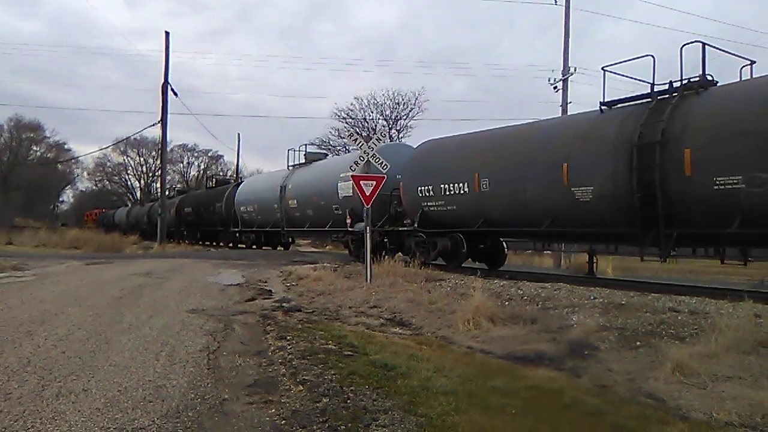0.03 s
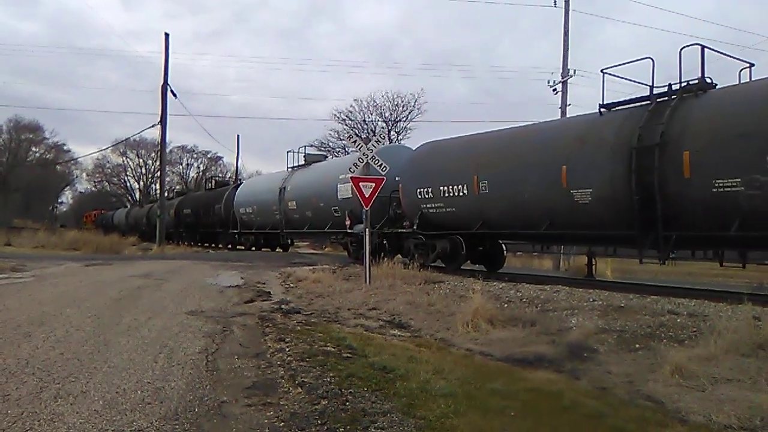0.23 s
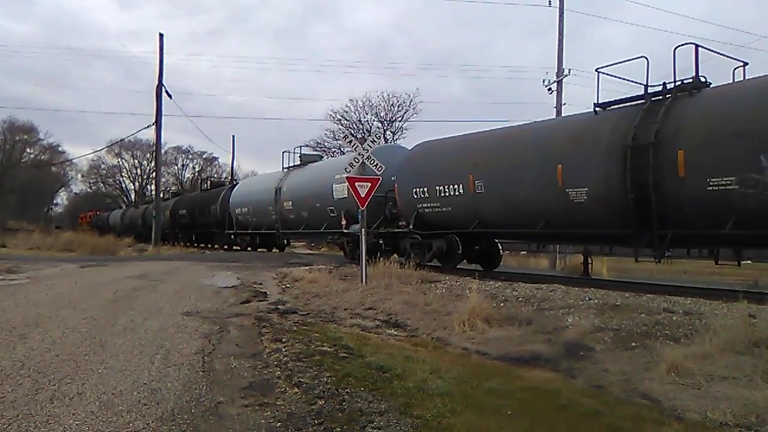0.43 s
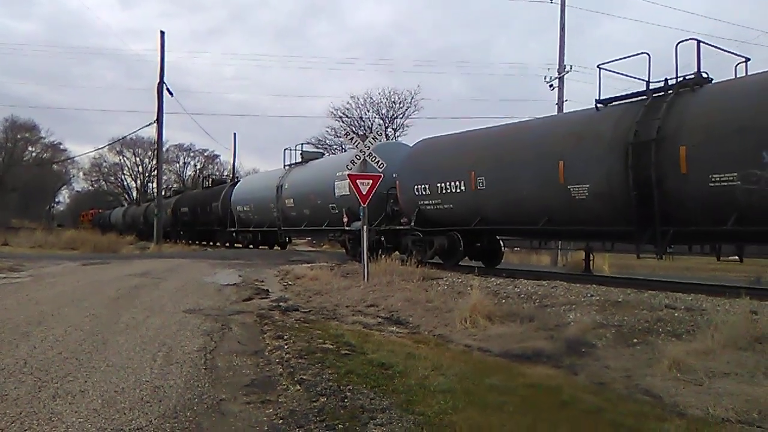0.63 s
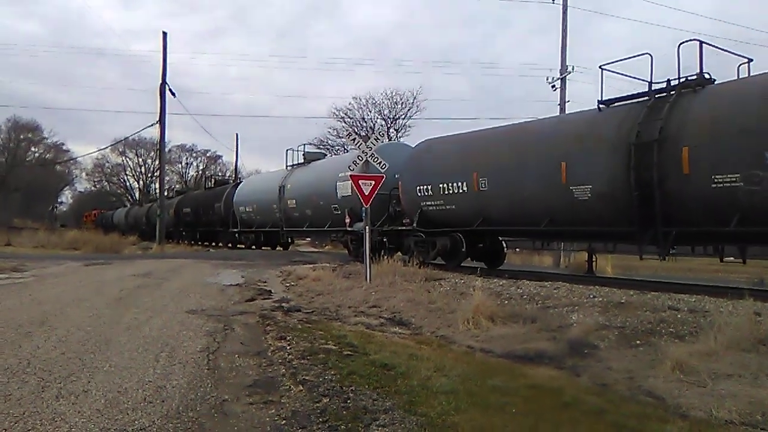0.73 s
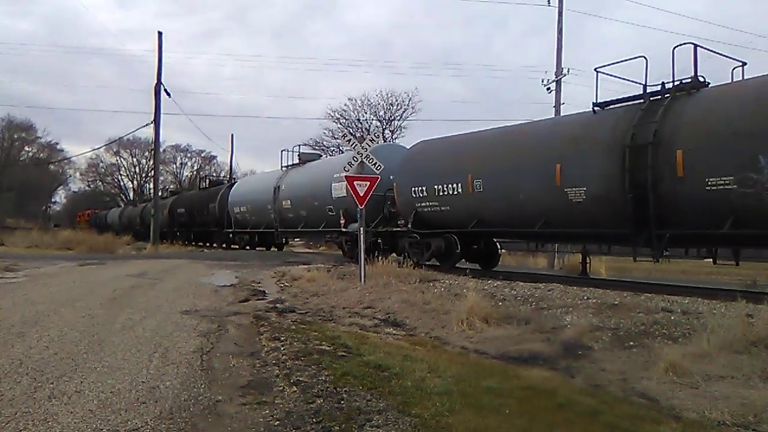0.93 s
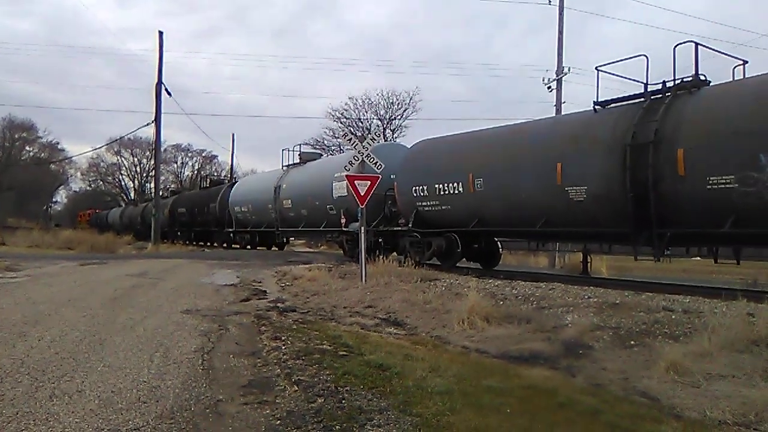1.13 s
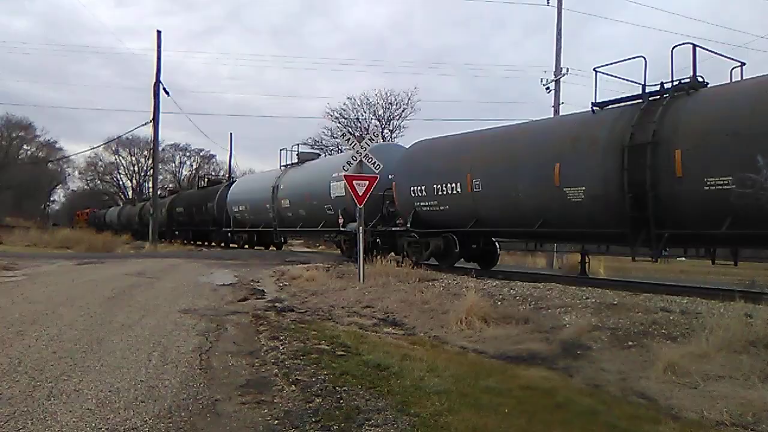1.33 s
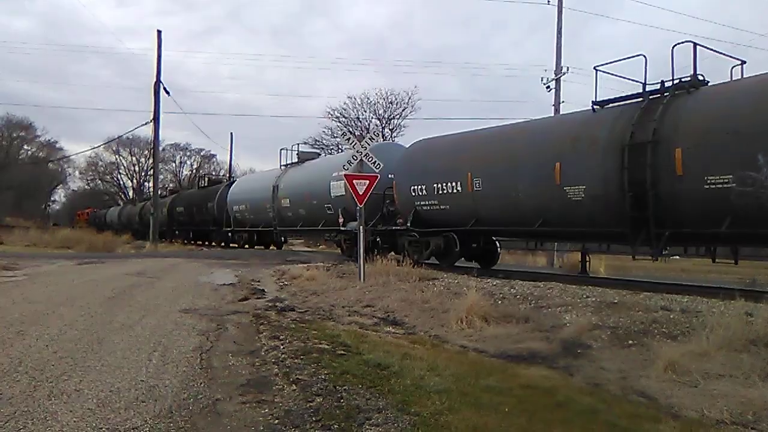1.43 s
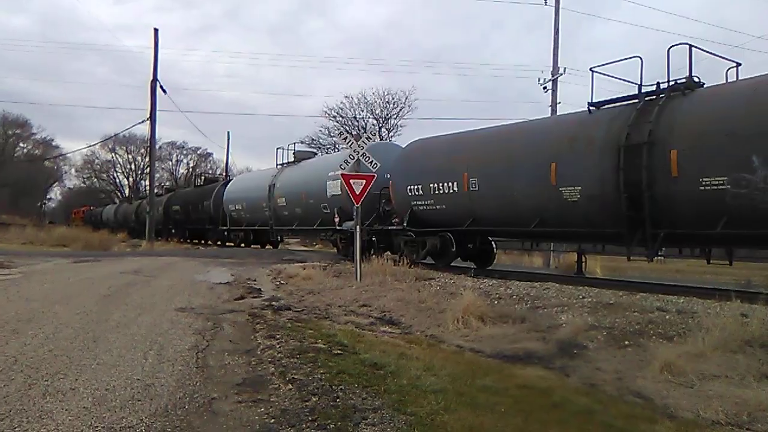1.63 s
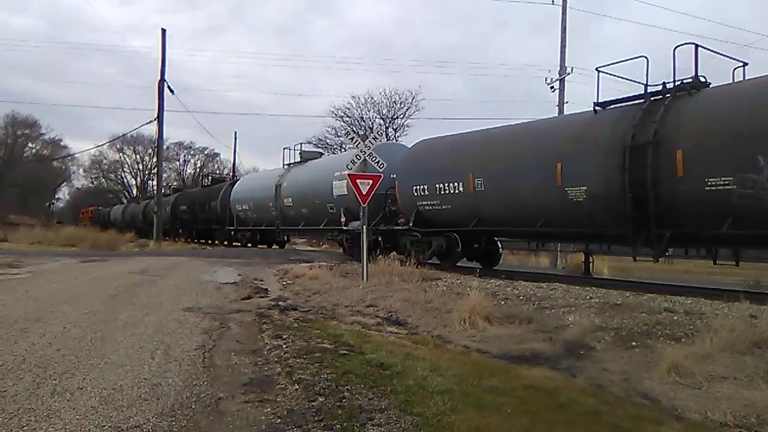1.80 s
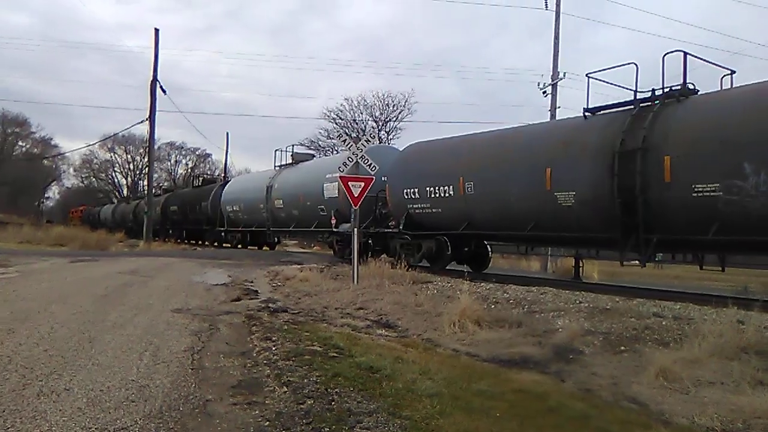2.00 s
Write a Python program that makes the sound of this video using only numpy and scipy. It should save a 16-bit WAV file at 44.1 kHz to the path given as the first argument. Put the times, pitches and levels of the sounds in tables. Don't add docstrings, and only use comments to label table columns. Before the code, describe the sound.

Slack runs through a line of tank cars: metallic bangs rushing nearer while wind thumps the microphone

```python
import sys
import numpy as np
from scipy import signal
from scipy.fft import rfft, irfft
from scipy.io import wavfile
from scipy.ndimage import uniform_filter1d

SR = 44100
rng = np.random.default_rng(int(sys.argv[2]) if len(sys.argv) > 2 else 0)


def log_audio(samples):
    frames = np.atleast_2d(samples).T
    limited = np.clip(frames, -1, 1)
    pcm = np.round(limited * 32767).astype(np.int16)
    wavfile.write(sys.argv[1], SR, pcm)


def rack_gain(trim_db):
    fader = np.asarray(trim_db, float)
    return 10 ** (fader / 20)


N = 90890
T = np.arange(N) / SR
HZ = np.maximum(np.arange(N // 2 + 1) * SR / N, 1)


def rms_one(x):
    return x / np.sqrt(np.mean(x ** 2) + 1e-20)


def at_hz(points, slope_db_per_octave=0):
    hz, value = np.transpose(points)
    octaves_outside = np.maximum(np.log2(hz[0] / HZ), 0) + np.maximum(np.log2(HZ / hz[-1]), 0)
    return np.interp(np.log(HZ), np.log(hz), value) - slope_db_per_octave * octaves_outside


def colour(x, points):
    return rms_one(irfft(rfft(x) * rack_gain(at_hz(points, 6)), N))


def drift(rate_hz):
    r = np.exp(-2 * np.pi * rate_hz / SR)
    return rms_one(signal.lfilter([1], [1, -2 * r, r * r], rng.standard_normal(N + SR))[SR:])


def ring(x, hz, t60_s):
    r = rack_gain(-60 / (t60_s * SR))
    w = 2 * np.pi * hz / SR
    return signal.lfilter([0, np.sin(w)], [1, -2 * r * np.cos(w), r * r], x + 1e-18)


def burst(start_s, rise_s, t60_s):
    t = np.maximum(T - start_s, 0)
    return np.minimum(t / rise_s, 1) * rack_gain(-60 * np.maximum(t - rise_s, 0) / t60_s)


# f/Hz, density/dB
KNOCK = [(100, 0.5), (250, -3), (600, -16), (1100, -34), (1800, -37.5), (4000, -77)]


def knock():
    level_db, rise_s, t60_s = -15, 0.004, 0.11
    puff = colour(rng.standard_normal(N), KNOCK)
    return rack_gain(level_db) * burst(0, rise_s, t60_s) * puff * rack_gain(np.array([[0], [-16]]))


def squeal():
    hz, width_hz, level_db, pan_db = 6000, 220, -47, 26
    end_s, fade_s = .215, .025
    t60_s = 1.06 / width_hz
    tone = rms_one(ring(ring(rng.standard_normal(N), hz, t60_s), hz, t60_s))
    release = np.exp(-np.maximum(T - end_s, 0) / fade_s)
    return rack_gain(level_db) * tone * release * rack_gain(np.array([[0], [-pan_db]]))


# f/Hz, left-right/dB
PORT_BALANCE = [(150, 6.5), (700, -0.5), (1500, -6), (2700, -7), (4000, 4), (5600, 8), (8000, 6),
                (12000, 1.5)]
# f/Hz, left lead/rad
PORT_LEAD = [(450, 1), (800, 1.5), (1460, 6), (4910, 19.5), (8100, 24.5), (10700, 49.5), (14000, 43)]


def ports(direct, apart):
    direct_share = 0.44
    notch_hz, notch_width_hz, notch_db = 5050, 300, -18
    half = rack_gain(at_hz(PORT_BALANCE) / 2) * np.exp(.5j * at_hz(PORT_LEAD))
    notch = rack_gain(notch_db * np.exp(-((HZ - notch_hz) / notch_width_hz) ** 2))
    mix = np.sqrt(direct_share) * direct + np.sqrt(1 - direct_share) * apart
    return irfft(rfft(mix) * np.array([half, notch / half]), N)


# f/Hz, density/dB
AIR = [(59, -45), (100, 3.5), (190, -12.5), (254, -19.5), (434, -15.5), (895, -29), (1150, -29),
       (1960, -32), (7500, -47.5), (14000, -59)]


def air():
    level_db, waver_db, waver_hz = -40, 1.2, 8
    noise = rng.standard_normal((3, N))
    level = rack_gain(level_db + waver_db * drift(waver_hz))
    return level * ports(colour(noise[0], AIR), colour(noise[1:], AIR))


# t/s, f/Hz, ring/cycles
PINGS = [(0, 7700, 30), (.405, 4200, 17), (.495, 2780, 12), (.50, 5850, 10), (.585, 1555, 250),
         (.91, 5500, 300), (1.08, 3700, 100), (1.337, 6750, 126), (1.455, 1880, 126), (1.46, 1590, 126),
         (1.75, 12070, 300), (1.755, 7900, 126), (1.765, 1840, 120), (1.772, 3650, 30), (1.82, 7150, 200),
         (1.898, 5540, 126), (1.90, 4900, 250), (1.963, 1885, 80), (2.035, 7150, 126)]
# level/dB, t60/s, left-right/dB
PING_SHAPES = [(-64.5, 1.6, -5), (-51, 0.22, 4), (-48.5, 0.49, -9.5), (-56.5, 1.8, 11), (-46.5, 0.71, -5.5),
               (-60.5, 2, 5.5), (-53.5, 0.49, -2), (-29.5, 0.22, -5.5), (-27, 0.36, -6), (-35, 0.56, 9),
               (-48, 0.43, 13), (-26.5, 0.14, 11), (-14.5, 0.19, 1), (-21.5, 0.23, 7), (-30, 0.098, 12),
               (-26.5, 0.51, 10), (-27, 0.74, 7.5), (-24.5, 0.2, 13.5), (-35, 0.23, 13)]


def pings():
    rise_s, right_lag_samples = 0.0075, 24
    out = np.zeros((2, N))
    for (start_s, hz, cycles), (db, t60_s, pan_db) in zip(PINGS, PING_SHAPES):
        push = rng.standard_normal(N)
        mode_t60_s = cycles / hz
        mode = rms_one(ring(ring(push, hz, mode_t60_s), hz, mode_t60_s))
        partner = rms_one(ring(push, hz * 1.02, mode_t60_s))
        tone = mode + .3 * partner
        tone = tone / (uniform_filter1d(tone ** 2, size=600) + 0.076) ** 0.23
        tone = tone * burst(start_s, rise_s, t60_s) * rack_gain(db)
        right = np.roll(tone, right_lag_samples) * (T > start_s)
        out += np.array([tone, right]) * rack_gain(np.array([[pan_db / 2], [-pan_db / 2]]))
    return out


# t/s, level/dB, length/s, left-right/dB
GUSTS = [(.004, -12.5, 0.049, 33), (0.078, -20, 0.034, 33), (.14, -11.5, 0.041, 27),
         (0.171, -12, 0.053, 31), (0.232, -7.5, 0.031, 37), (0.349, -26, 0.13, -20),
         (0.426, -28, 0.042, 17), (0.561, -18, 0.027, 19), (0.647, -23, 0.064, 9), (0.72, -23.5, 0.029, 30),
         (0.774, -13, 0.018, 51), (0.84, -18.5, 0.049, 42), (0.88, -14.5, 0.025, 25),
         (0.952, -18.5, 0.042, 10), (1.006, -12.5, 0.019, 27), (1.045, -18.5, 0.041, 11),
         (1.145, -26.5, 0.058, 4.5), (1.316, -15, 0.045, 33), (1.347, -15.5, 0.03, 8.5),
         (1.438, -18.5, 0.046, 12), (1.535, -18.5, 0.031, 1.5), (1.591, -15.5, 0.026, 15),
         (1.679, -9.5, 0.037, 25), (1.75, -17, 0.042, 18), (1.8, -14.5, 0.089, 27), (1.873, -15, 0.055, 2),
         (1.945, -19, 0.027, 0.5), (2.004, -17, 0.071, 8), (2.055, -14, 0.05, 9)]
# f/Hz, density/dB
WIND = [(30, -11), (42, -6), (55, 5), (80, 0.5), (160, -14), (437, -30), (800, -48.5), (1300, -62.5)]


def wind():
    breeze_db, shared = -41, 0.34
    noise = rng.standard_normal((3, N))
    flow = colour(noise[1:] + shared * 2 * noise[0], WIND)
    flow = rms_one(flow / np.sqrt(uniform_filter1d(flow ** 2, size=900) + 0.061))
    power = rack_gain(2 * breeze_db) + np.zeros((2, N))
    for centre_s, db, length_s, pan_db in GUSTS:
        side = rack_gain(2 * db + 2 * np.minimum(np.array([[pan_db], [-pan_db]]), 0))
        power = power + side * np.exp(-((T - centre_s) / (.5 * length_s)) ** 2)
    return np.sqrt(power) * flow


# t/s, f/Hz, level/dB, t60/s, left-right/dB
THUMPS = [(0.049, 162, -18.5, 0.14, 21), (.095, 104, -3, 0.035, 30), (.27, 198, -28, 0.13, 9),
          (0.321, 87.6, -19.5, 0.21, 8), (0.86, 150, -17, 0.074, 24), (.90, 394.7, -34.5, 0.64, 5.5),
          (0.813, 160, -18, .06, 15), (0.939, 147, -26, 0.09, 10), (.988, 187, -13.5, .05, 24),
          (1.038, 112, -23, 0.044, 18), (1.134, 148, -23.5, 0.14, 11), (1.177, 133.3, -19, 0.31, 1),
          (1.331, 153, -6.5, 0.1, 14), (1.405, 70, -19, 0.17, 5.5), (1.451, 246, -16.5, 0.15, 4),
          (1.495, 184.6, -14, 0.12, 0), (1.582, 111, -4.5, .05, 17), (1.629, 138, -12.5, 0.12, 16),
          (1.666, 99, -11.5, .08, 2), (1.699, 130, -7, 0.07, 5), (1.714, 189, -10, 0.089, 5),
          (1.716, 71.7, -6, 0.22, 18), (1.764, 180, -13, 0.067, 4), (1.86, 75.4, -21, 0.052, 10),
          (1.88, 175, -19, 0.023, 13), (1.909, 85.7, -8, 0.17, 6)]


def thumps():
    rise_s = 0.00294
    out = np.zeros((2, N))
    for start_s, hz, db, t60_s, pan_db in THUMPS:
        cycle = np.sin(-2 * np.pi * hz * (T - start_s))
        tone = rack_gain(db) * burst(start_s, rise_s, t60_s) * cycle
        out += tone * rack_gain(np.minimum(np.array([[pan_db], [-pan_db]]), 0))
    return out


BLOCKED_S = [
    .218,
    .240,
    1.678,
]


def choke(x):
    depth_db, length_s = -22, .006
    left = rack_gain(depth_db * sum(np.exp(-((T - t) / length_s) ** 4) for t in BLOCKED_S))
    return x * np.array([left, np.ones(N)])


# f/Hz, density/dB
CLATTER = [(290, -20), (500, -6), (1230, -11), (1840, -4), (2800, -9), (3560, -6), (4210, -13.5),
           (5570, -9), (8500, -12.5), (14200, -18.5)]


def steel():
    touches_per_s, spread_db, bare_top_hz = 2500, 0.5, 9150
    ring_cycles, ring_db, ring_top_hz = 220, -3.5, 9000
    touches = (rng.random(N) < touches_per_s / SR) * rack_gain(spread_db * np.minimum(rng.exponential(1, N), 4))
    touches = rms_one(touches * rng.choice([-1, 1], N)) + rng.standard_normal(N)
    modes_hz = np.geomspace(600, 14200, 50) * rng.uniform(0.89, 1.0, 50)
    swells = [rack_gain(3.1 * drift(5.5) + 3.84 * drift(10.0)) for _ in range(6)]
    rings = 0
    for k, hz in enumerate(modes_hz):
        weight = np.sqrt(hz) / (1 + (hz / ring_top_hz) ** 4)
        swell = np.roll(swells[k % 6], 9000 * k)
        rings = rings + weight * rms_one(ring(touches, hz, ring_cycles / hz)) * swell
    bare = irfft(rfft(touches) * (0.48 + 1 / (1 + (HZ / bare_top_hz) ** 6)), N)
    return colour(rms_one(bare) + rack_gain(ring_db) * rms_one(rings), CLATTER)


# t/s, level/dB, rise/s, t60/s, boom/dB
SLAMS = [(.36, -52.5, 0.07, 0.88, -2), (0.485, -44, 0.025, 0.61, 0.5), (.525, -45.5, .04, 0.65, -1.5),
         (0.89, -43.5, 0.014, 0.7, 6), (1.085, -45, 0.013, 0.26, 1), (1.107, -42, 0.011, 0.3, -11),
         (1.157, -38.5, 0.02, 0.99, 11), (1.181, -29.5, 0.014, 0.56, -0.5), (1.328, -28.5, 0.013, 1, 1),
         (1.431, -26, 0.013, 0.53, 7.5), (1.451, -25.5, 0.02, 1, 0), (1.482, -33, 0.0071, 1, -17),
         (1.608, -27, 0.016, 0.95, 2), (1.687, -24, 0.024, 1, 4), (1.72, -24.5, 0.023, 0.5, -3),
         (1.749, -18, 0.0026, 0.33, -15), (1.759, -15.5, 0.0078, 0.33, -13.5),
         (1.787, -18, 0.0056, 0.26, -11), (1.894, -17.5, 0.00196, 0.17, -51),
         (1.902, -16, 0.0027, 0.24, -47), (1.962, -16.5, 0.0044, 0.33, -65), (1.98, -17.5, 0.0068, 0.1, -9),
         (2.042, -20, 0.0097, 0.083, 5.5)]
# top f/Hz, share of t60, extra loss per dB of distance/dB, share of boom dB
PARTS = [
    (1690, 1.25, 0, 0.11),
    (4140, 1.036, 0, 0),
    (8170, 1.03, 0.09, 0),
    (15600, 0.75, 1.36, 0),
]
# f/Hz, density/dB
BOOM = [(53, -80.5), (90, -3), (151, -2.5), (437, -10), (600, -30.5), (900, -14.5), (1170, -23),
        (1980, -120)]


def slams():
    nearest_db, boom_level_db, boom_linger = -15, 0.5, 1
    echo_db, echo_t60_s = -15, 0.94
    other = steel()
    metal = rfft(ports(steel(), np.array([other, other[::-1]])))
    echo = sum((rack_gain(db + echo_db) * burst(s, 4 * rise, echo_t60_s)) ** 2 for s, db, rise, _, _ in SLAMS)
    rattle, below = 0, 0
    for top_hz, t60_share, loss, boom_share in PARTS:
        upto = 1 / (1 + (HZ / top_hz) ** 8)
        power = 0
        for s, db, rise, t60, boom_db in SLAMS:
            part_db = db + loss * (db - nearest_db) + boom_share * boom_db
            power = power + (rack_gain(part_db) * burst(s, rise, t60_share * t60)) ** 2
        band = irfft(metal * (upto - below), N)
        rattle = rattle + np.sqrt(power + echo * t60_share ** 4) * band
        below = upto
    boom_power = sum((rack_gain(db + boom_db + boom_level_db) * burst(s, 2 * rise, boom_linger * t60)) ** 2
                     for s, db, rise, t60, boom_db in SLAMS)
    noise = rng.standard_normal((3, N))
    boom = np.sqrt(boom_power) * colour(noise[0] + 0.2 * noise[1:], BOOM)
    return rattle * rack_gain(0.54 * drift(25)) + boom


def ground(x):
    lag_s, share, end_s = .00164, .55, 1.2
    late = np.roll(uniform_filter1d(x, size=5), int(lag_s * SR), axis=-1)
    return x - share * np.clip(10 * (end_s - T), 0, 1) * late * (T > lag_s)


def scene():
    far = ground(slams() + air())
    return far + knock() + squeal() + pings() + wind() + thumps()


def top_cut(x):
    return signal.sosfilt(signal.butter(12, 14400, fs=SR, output="sos"), x)


def record(dry):
    low_cut_hz, fade_in_s = 37.5, .001
    x = choke(dry) * np.minimum(T / fade_in_s, 1)
    x = signal.sosfilt(signal.butter(2, low_cut_hz, "high", fs=SR, output="sos"), x)
    mix = 1.346 * np.tanh(x / 1.239)
    return top_cut(mix)


dry = scene()
out = record(dry)
log_audio(out)
```